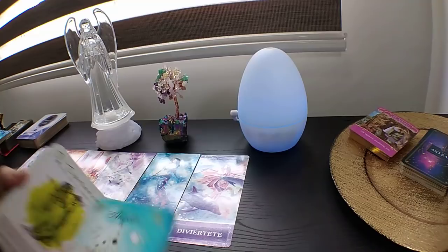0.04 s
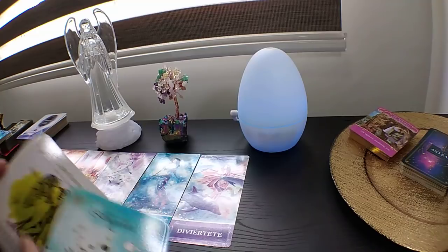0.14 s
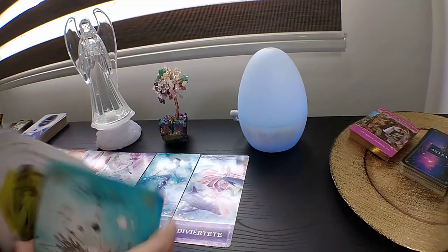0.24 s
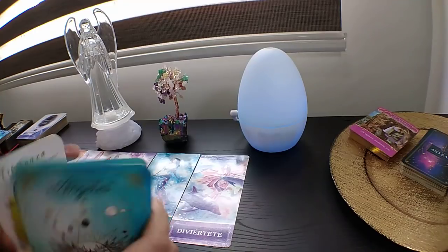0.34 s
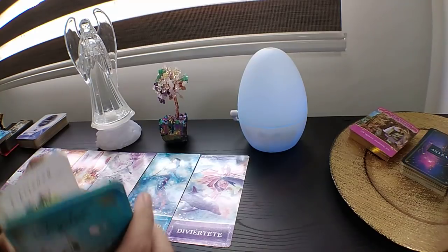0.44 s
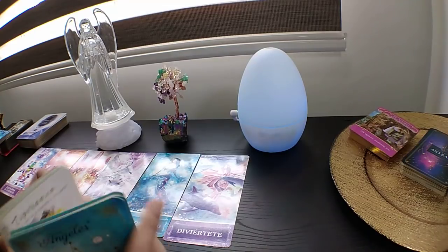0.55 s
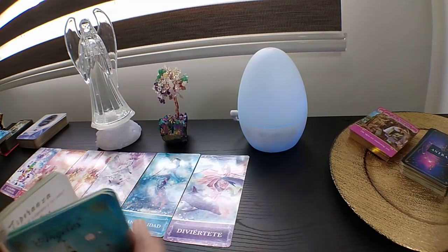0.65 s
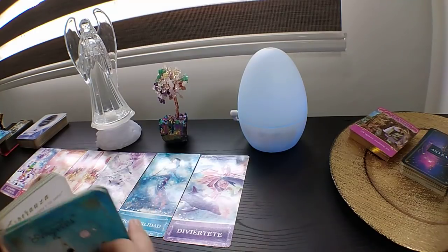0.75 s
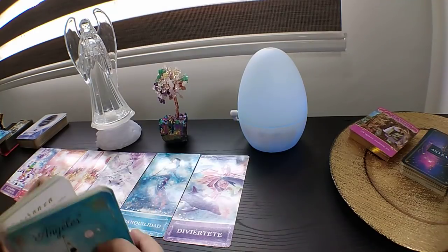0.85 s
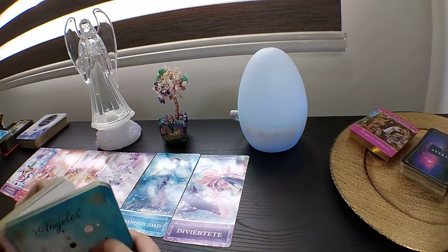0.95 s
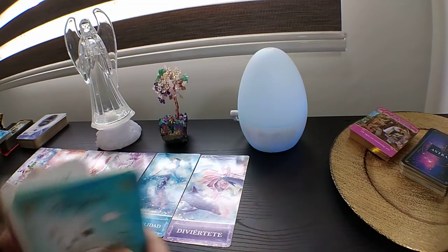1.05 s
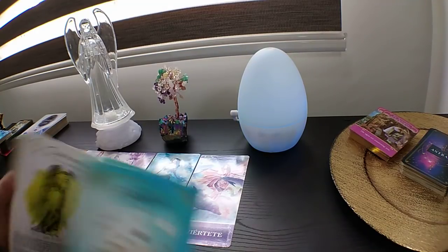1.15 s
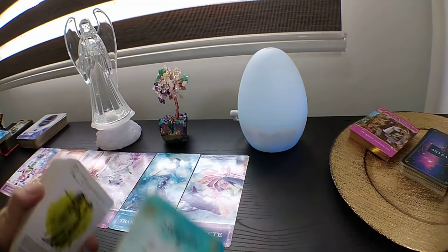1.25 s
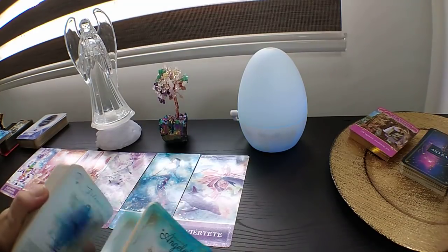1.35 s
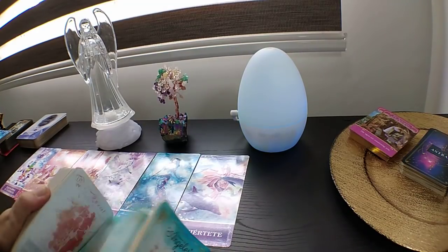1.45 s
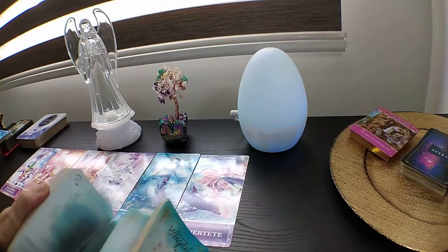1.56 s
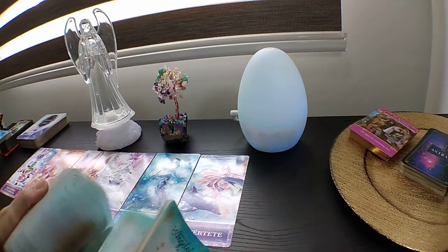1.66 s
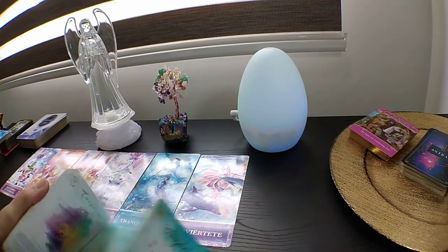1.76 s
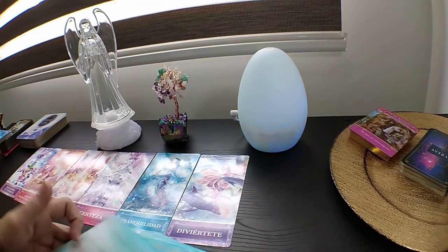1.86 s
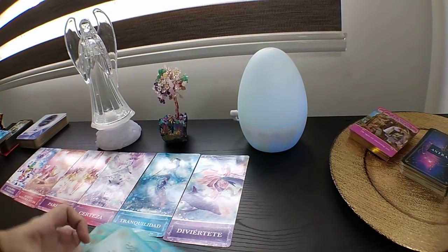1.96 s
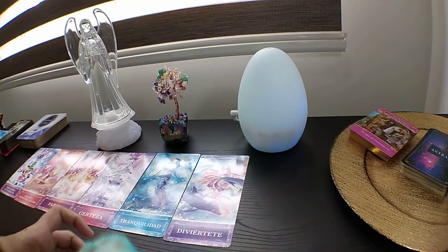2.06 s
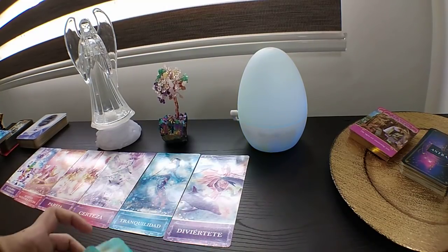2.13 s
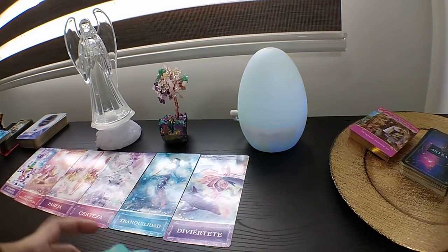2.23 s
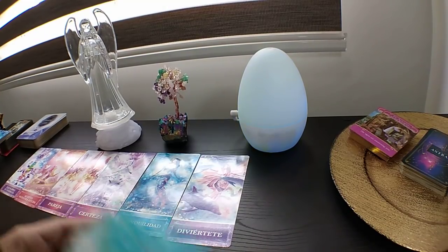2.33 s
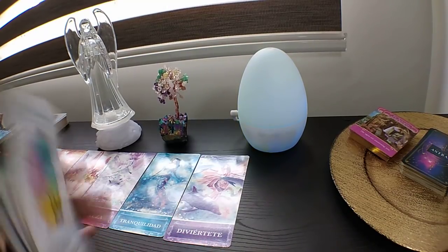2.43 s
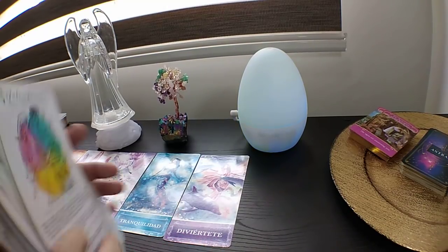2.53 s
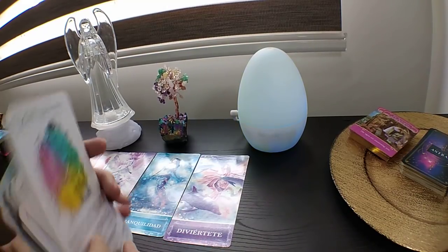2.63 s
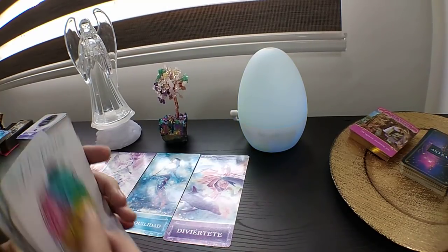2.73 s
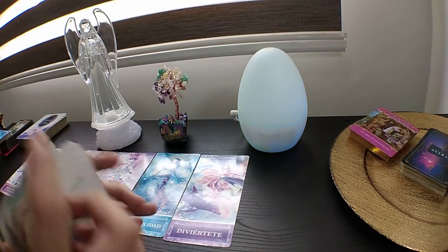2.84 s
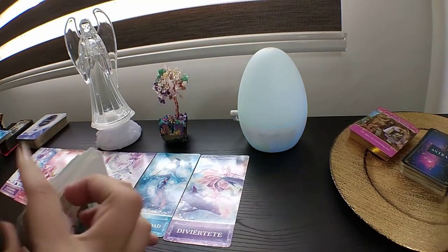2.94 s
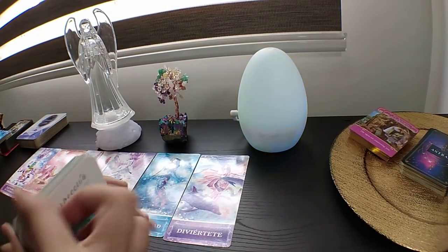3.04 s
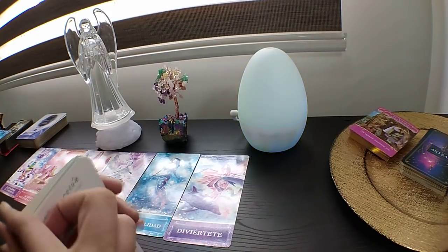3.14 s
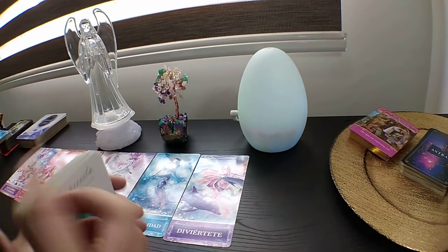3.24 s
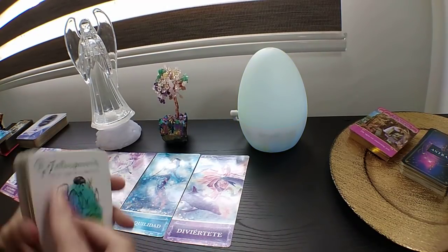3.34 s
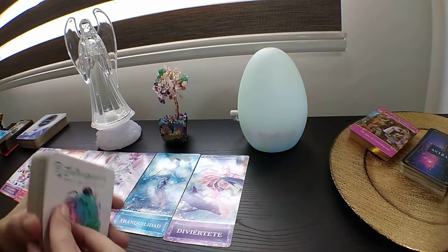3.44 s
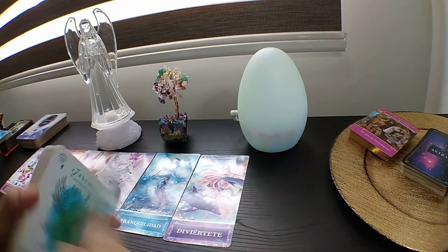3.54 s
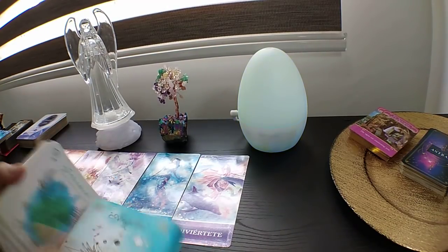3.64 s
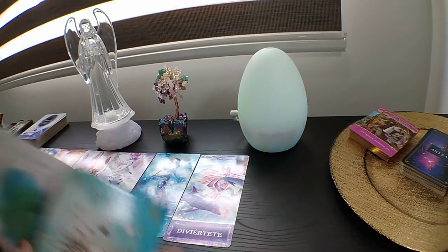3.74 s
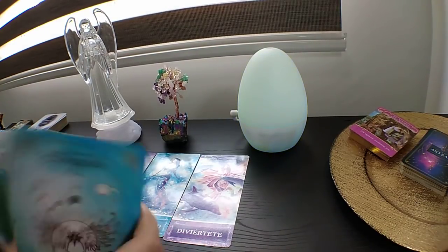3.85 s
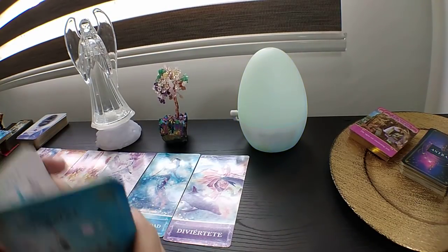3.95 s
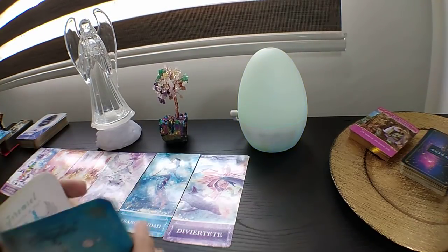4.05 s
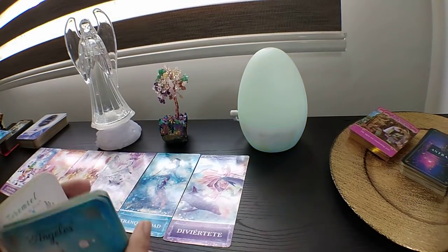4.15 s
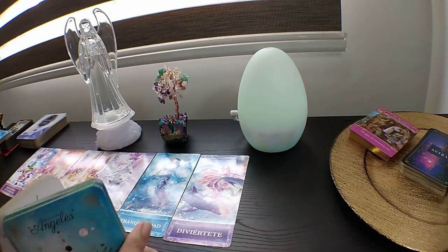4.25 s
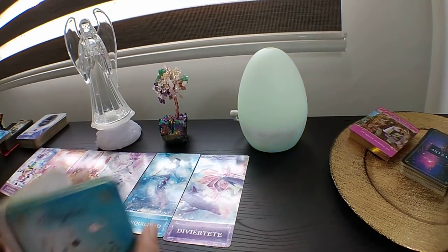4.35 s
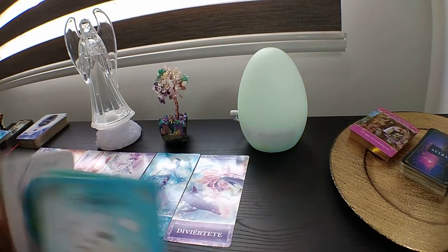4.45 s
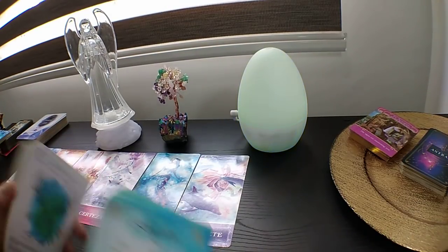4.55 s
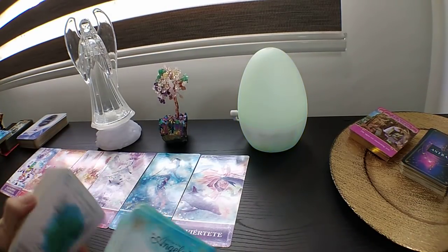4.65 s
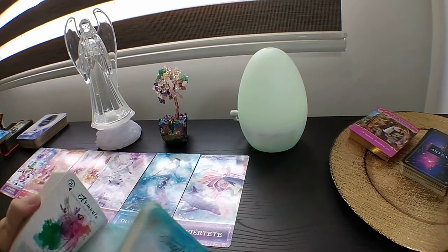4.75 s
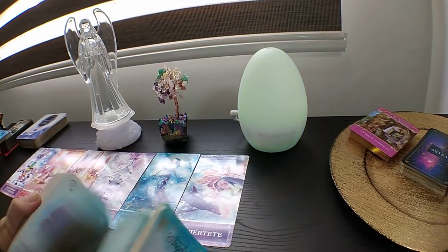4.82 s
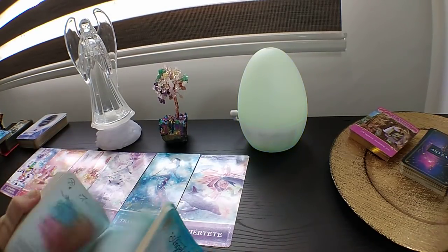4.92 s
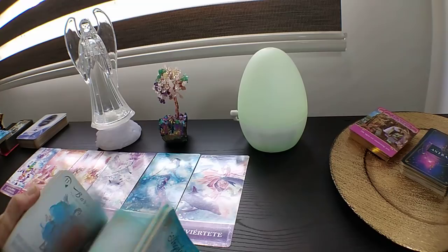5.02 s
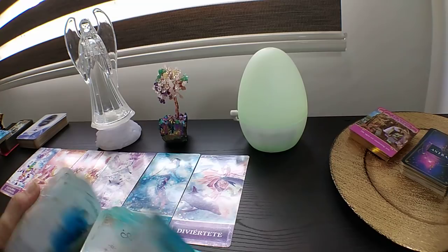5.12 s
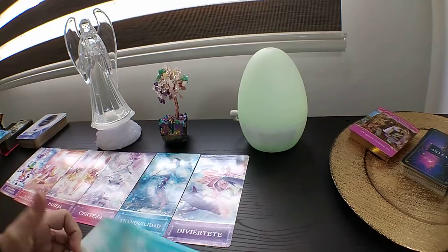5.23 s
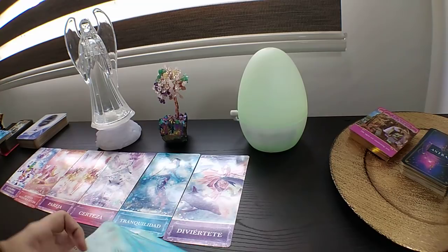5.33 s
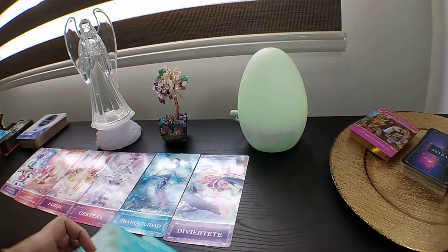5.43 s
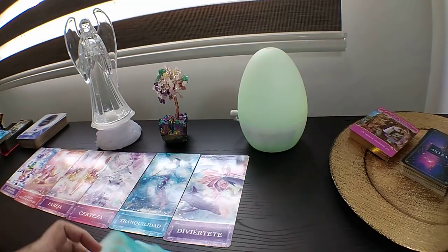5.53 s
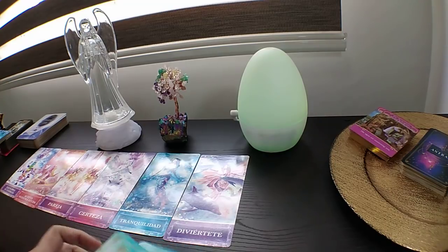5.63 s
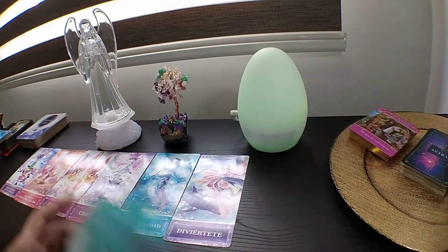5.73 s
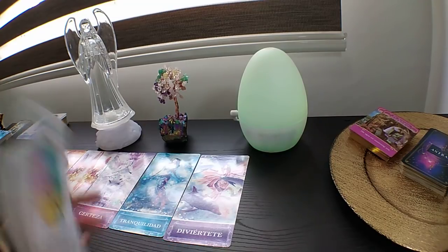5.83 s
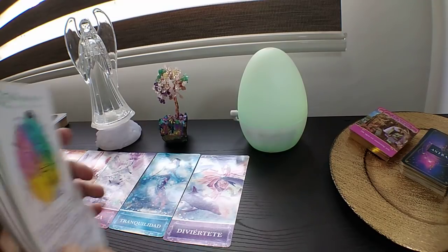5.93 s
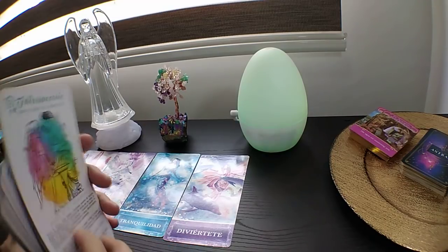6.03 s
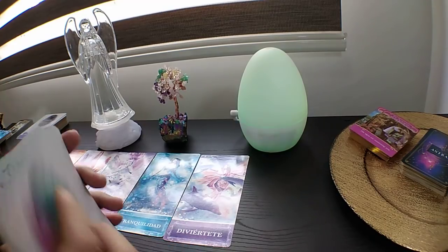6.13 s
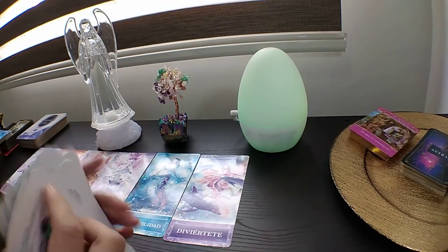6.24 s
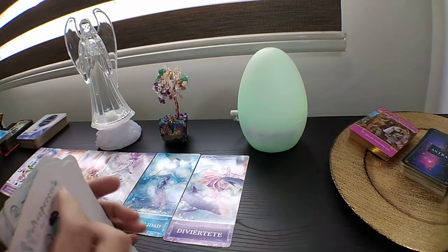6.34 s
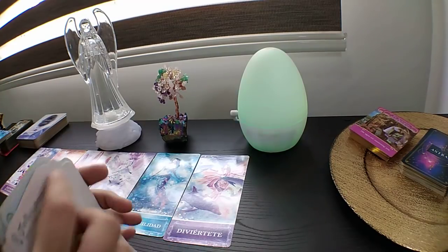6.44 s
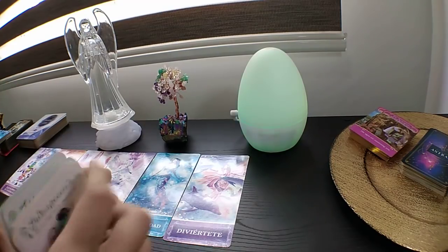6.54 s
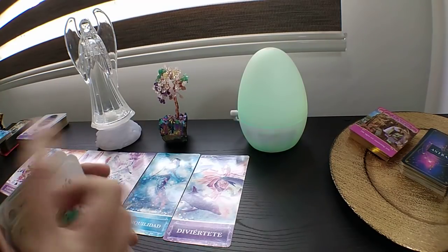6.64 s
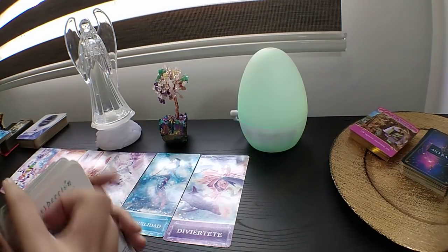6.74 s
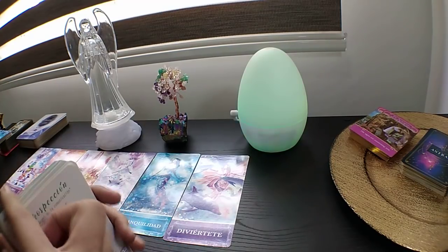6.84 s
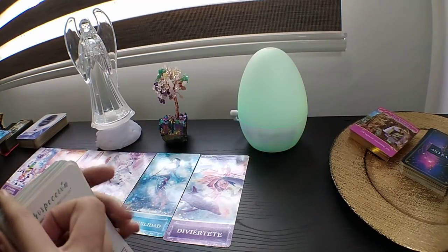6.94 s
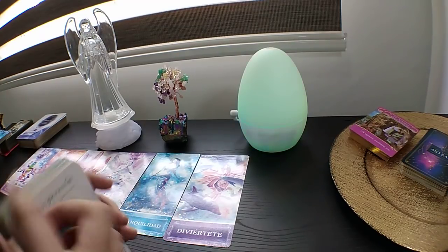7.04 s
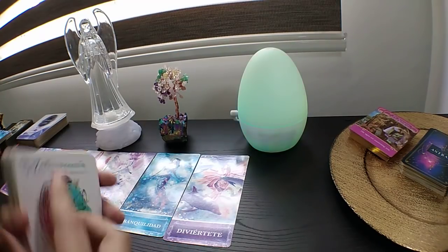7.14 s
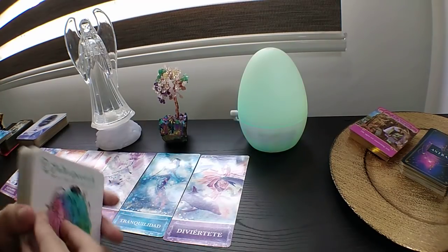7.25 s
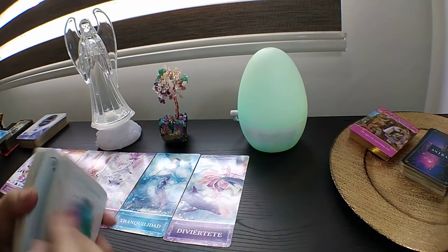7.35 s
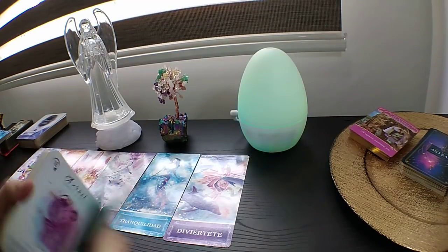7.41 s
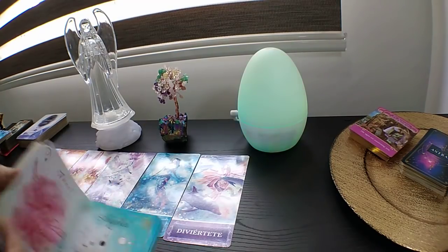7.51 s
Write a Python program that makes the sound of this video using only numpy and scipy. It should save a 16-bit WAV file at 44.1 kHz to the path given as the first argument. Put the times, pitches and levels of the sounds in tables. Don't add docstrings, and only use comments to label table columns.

```python
import sys
import numpy as np
from scipy import signal
from scipy.fft import rfft, irfft, next_fast_len
from scipy.io import wavfile
from scipy.ndimage import uniform_filter1d, map_coordinates

SR = 44100
rng = np.random.default_rng(int(sys.argv[2]) if len(sys.argv) > 2 else 0)


def store_wav(level_fs):
    pcm = np.round(np.clip(np.atleast_2d(level_fs), -1, 1) * 32767)
    wavfile.write(sys.argv[1], SR, pcm.T.astype(np.int16))


def gain_from_db(level_db):
    decades = np.asarray(level_db, float) / 20
    return 10 ** decades


N = 334278
SILENT_DB = -200
EDGE_MS, DULL_RING_DB = 8.65, -16
RIGHT_EARLY = 13


def unit(x):
    return x / np.sqrt(np.mean(x ** 2) + 1e-20)


def along(points, hz):
    f, v = np.transpose(points)
    return np.interp(np.log(hz + 1), np.log(f + 1), v)


def filtered(x, response):
    m = next_fast_len(x.shape[-1] + 4096)
    spectrum = rfft(x, m) * response(np.fft.rfftfreq(m, 1 / SR))
    return irfft(spectrum, m)[..., :x.shape[-1]]


def colour(points):
    return lambda hz: unit(gain_from_db(along(points, hz)))


def modes(rows):
    def response(f):
        total = 0
        for k, (centre, width, db) in enumerate(rows):
            damping = 1j * f * width
            total = total + (-1) ** k * gain_from_db(db) * damping / (centre ** 2 - f * f + damping)
        return total
    return response


def muffled(corner_hz):
    return lambda hz: 1 / (1 + (hz / corner_hz) ** 8)


def causal(gain):
    cepstrum = irfft(np.log(gain + 1e-6))
    half = cepstrum.shape[-1] // 2
    fold = np.r_[1, np.full(half - 1, 2), 1, np.zeros(half - 1)]
    return np.exp(rfft(cepstrum * fold))


def grit(shape, spread_db, share):
    size = np.minimum(rng.exponential(1, shape), 4)
    spikes = rng.standard_normal(shape) * gain_from_db(spread_db * size)
    return unit(spikes * (rng.random(shape) < share))


def landing(ms):
    swell = np.arange(2048) / SR / (0.00027 * np.clip(ms, .5, 45))
    return (swell * np.exp(1 - swell)) ** 2


def cluster(shape, spread_db):
    z = rfft(shape * grit(len(shape), spread_db, share=.5))
    even = irfft(z / np.abs(z) ** .75) * shape ** .3
    return unit(even) * np.sqrt(np.mean(shape ** 2))


# (frequency [Hz], level [dB])
SNAP = [(1500, -14.5), (3000, -5), (5000, -4.5), (8000, -3), (10500, -8), (13500, -19), (15500, -42.5)]


def tinted(knots_db):
    knots_hz = np.linspace(0, 16000, len(knots_db))
    return lambda hz: colour(SNAP)(hz) * gain_from_db(np.interp(hz, knots_hz, knots_db))


# (frequency [Hz], level [dB])
CLACK = [(500, -31), (900, -1.5), (1500, 4), (2200, 1), (3000, -5), (3800, -15.5), (8000, -27),
         (11000, -36), (14000, -69.5)]
# (frequency [Hz], width [Hz], level [dB])
SHEET = [(1485, 99, -9), (2120, 150, -6.5)]


def packet(tilt_db, ring_db=-30):
    def response(hz):
        tilt = tilt_db * np.log2(np.clip(hz, 700, 3000) / 1500)
        ring = 1 + gain_from_db(ring_db) * np.abs(modes(SHEET)(hz))
        return gain_from_db(along(CLACK, hz) + tilt) * ring
    return response


def strokes(rows, attack_share=0.056):
    sag_db, release_db_per_s = 6.5, 607
    t, faces, hands = np.arange(N) / SR, np.zeros(N), np.zeros(N)
    for s, length_s, rasp_db, rumble_db in rows:
        rise = np.clip((t - s) / (attack_share * length_s), 0, 1) ** 2
        sag = sag_db * np.clip((t - s) / length_s, 0, 1)
        release = release_db_per_s * np.maximum(t - s - length_s, 0)
        press = rise * gain_from_db(rasp_db - sag - release)
        faces += press
        hands += press * gain_from_db(rumble_db)
    return faces, hands


# (start [s], length [s], rasp [dB], handling rumble re rasp [dB])
STROKES = [(0, 0.057, -53.5, -8), (0.557, 0.11, -56, -14), (0.865, 0.31, -58.5, -9),
           (1.335, 0.24, -49, -13), (1.487, 0.096, -23, -2.5), (1.62, 0.2, -25, -7.5),
           (1.894, 0.37, -46, -5), (2.25, 0.15, -42, -19.5), (2.441, 0.39, -41, -29),
           (2.87, 0.065, -30.5, -13), (3.003, 0.42, -48, -26), (3.56, 0.035, -72, -36),
           (3.715, 0.052, -50.5, -3.5), (3.84, 0.17, -56.5, -19), (4.116, 0.31, -50, -28),
           (4.558, 0.016, -54.5, -29.5), (4.727, 0.092, -42.5, -25), (4.916, 0.029, -24.5, -25.5),
           (5.051, 0.1, -22.5, -11.5), (5.222, 0.71, -47.5, 3), (5.589, 0.88, -48, -26.5),
           (5.962, 0.19, -35, -40.5), (6.232, 0.00996, -21, -16), (6.279, 0.62, -49.5, -22),
           (6.57, 0.027, -34.5, -18), (6.778, 0.25, -54.5, 11.5), (7.09, 0.17, -66, -22),
           (7.54, 0.16, -32.5, -28)]
# (frequency [Hz], width [Hz], level [dB])
GAPS = [(1900, 630, -0.5), (4770, 1700, 1.5), (5440, 910, 4.5), (9700, 11000, -1.5)]


def slide():
    faces, hands = strokes(STROKES)
    drift = map_coordinates(rng.standard_normal(N // 300 + 4), [np.arange(N) / 300])
    grains = grit((3, N), spread_db=6.0, share=0.14) * gain_from_db(-8.5 + 0.71 * drift)
    rasp = filtered(faces * grains[0], colour(SNAP))
    body = filtered(faces * gain_from_db(1.5) * grains[1], packet(0))
    rub = gain_from_db(-6.0) * filtered(rasp + body, lambda hz: np.abs(modes(GAPS)(hz)))
    whisking, grip = whisks(grains[0])
    rub, hands = rub + whisking, hands + grip
    desk_gain = lambda hz: gain_from_db(along(THUD, hz)) + gain_from_db(along(BOOM, hz))
    rumble = filtered(hands * gain_from_db(8.5) * grains[2], desk_gain)
    return np.array([np.roll(rub, RIGHT_EARLY), rub]) + rumble


# (start [s], length [s], rasp [dB], handling rumble re rasp [dB], top [Hz])
WHISKS = [
    (.045, 0.29, -41.5, -35, 2200),
    (0.3, 0.16, -42.5, -27.5, 13000),
    (3.694, .22, -57, -3, 2900),
    (3.95, 0.2, -49, -26.5, 8300),
    (3.6, 0.11, -59, -16, 6500),
]
# (frequency [Hz], width [Hz], level [dB])
SINGING = [(1855, 200, 0), (2640, 200, -4), (3200, 250, -1.5), (4230, 220, 7.5), (5200, 890, 4),
           (8960, 4800, -1.5)]


def whisks(grains):
    rub, hands = np.zeros(N), np.zeros(N)
    for *row, top_hz in WHISKS:
        whisk, grip = strokes([row], attack_share=0.38)
        song = lambda hz: np.abs(modes(SINGING)(hz)) ** 1.6 * muffled(top_hz)(hz)
        rub += filtered(whisk * grains, song)
        hands += grip
    return rub, hands


# (time [s], snap [dB], clack [dB], left minus right [dB])
BRUSHES = [
    (0.054, -41.5, -59, -2),
    (0.087, -36, -58.5, -8),
    (3.546, -44.5, -89, -7.5),
    (3.704, -43, -75.5, 3),
    (3.814, -48, -64.5, 1),
    (5.53, -57, -49, 1),
    (5.744, -43.5, -63, 0.5),
    (6.0, -38.5, -63.5, -0.5),
    (7.375, -57.5, -88, -5),
]


def brushes():
    return [(s, snap, clack, 2.5, pan, 5.5, 32, DULL_RING_DB) for s, snap, clack, pan in BRUSHES]


# (time [s], snap [dB], clack [dB], left minus right [dB])
TICKS = [(5.6986, -39, -57.5, 2), (5.8611, -37.5, -59, -3), (7.251, -58, -87, 4), (1.3916, -38, -52.5, 1.5),
         (0.226, -43, -62, -2.5), (0.237, -48, -64, 0), (7.388, -50.5, -88, -1), (6.773, -38, -62, 0),
         (1.3285, -36.5, -53, -1), (1.368, -36.5, -55.5, -4), (1.4291, -34.5, -56, 0),
         (2.3997, -39, -50, 7.5), (2.4476, -29, -45, -3), (3.799, -41, -58, -8.5),
         (4.5838, -25.5, -47, 2.5), (4.6928, -39, -55.5, -4), (4.7215, -36, -45, -2), (6.6, -31, -51, 1.5),
         (6.2702, -17.5, -32, 0), (7.102, -51, -88, -1), (7.528, -29, -47.5, 4.5), (0.513, -47, -59.5, -2),
         (2.33, -49, -49, 2), (2.483, -40.5, -49, 0)]


def ticks():
    return [(s, snap, clack, 4.5, pan, 6.5, EDGE_MS, DULL_RING_DB) for s, snap, clack, pan in TICKS]


# (time [s], thud [dB], boom [dB])
BUMPS = [(0.241, -65, -67), (1.33, -25.5, -40), (2.288, -39.5, -49), (2.33, -45, -58.5),
         (2.398, -50.5, -63), (3.802, -47.5, -70), (4.187, -22.5, -35.5), (4.577, -32.5, -48.5),
         (4.715, -27.5, -37.5), (5.525, -17, -29), (5.545, -23.5, -32.5), (5.574, -30.5, -47),
         (5.598, -24, -54.5), (5.639, -31, -56.5), (5.688, -34.5, -59), (5.749, -50, -62.5),
         (6.269, -19.5, -29.5), (6.34, -30, -37)]


def bumps():
    return [(s, (db + 3.0, boom + 25, db - 30 + 17.0, db + 5.5, SILENT_DB), 13) for s, db, boom in BUMPS]


# (time [s], thud [dB], boom [dB], knock re thud [dB])
LANDINGS = [(.547, -17.5, -30.5, -9), (.853, -28.5, -43, -6.5), (1.493, -32, -47.5, -4),
            (1.546, -27.5, -35, -6.5), (1.68, -42.5, -53.5, 1), (1.778, -32, -36.5, -4.5),
            (1.97, -29.5, -41, -11.5), (2.638, -30, -31, 0), (2.849, -23.5, -35, -8.5),
            (2.878, -21.5, -45, -4), (2.987, -21.5, -43, -10), (3.122, -25.5, -50.5, -16.5),
            (3.257, -33, -50.5, -4.5), (4.104, -17, -19, -8), (4.795, -27.5, -41, -7),
            (4.852, -21.5, -41, -13), (4.938, -36, -31.5, -0.5), (5.075, -31.5, -38, -1.5),
            (5.242, -31.5, -36.5, -8), (5.35, -42.5, -42.5, -1.5), (6.037, -27, -37.5, -8.5),
            (6.143, -27, -42, -7.5), (6.229, -25, -41, 4.5), (6.238, -13.5, -35.5, -7),
            (6.594, -27.5, -53, -8.5), (6.739, -33, -44, -14.5), (7.526, -70, -72, 11.5),
            (6.8, -35, -46.5, 0), (2.291, -50, -57, -6), (2.333, -49, -59, -11), (4.583, -45.5, -60, -6.5)]


def landings():
    return [(s, (db + 13.5, boom + 25, db + knock + 16.5, SILENT_DB, SILENT_DB), 8.84)
            for s, db, boom, knock in LANDINGS]


# (time [s], clack [dB], tilt, brighter when thin [dB per octave], snap [dB])
SLAPS = [(0.5488, -20.5, 2.5, -52), (0.5709, -36, -13, -46), (2.6379, -36, -2.5, -39),
         (2.678, -46.5, -4.5, -29), (2.8073, -37, -9.5, -46.5), (2.8489, -37.5, -18.5, -30.5),
         (2.8997, -33, -6.5, -23.5), (3.1233, -29.5, -10.5, -30), (4.1032, -15, -3, -35.5),
         (4.1124, -29, -9, -25), (4.1248, -30, -22.5, -39), (4.1384, -35.5, 13.5, -37),
         (4.1892, -22, -2.5, -29.5), (4.1969, -27, -6, -27), (6.1437, -24.5, -2.5, -37),
         (6.2379, -11, -5, -15), (6.592, -30, -1, -26), (6.7393, -31.5, -6, -38),
         (6.7841, -31.5, -6.5, -32), (6.229, -24.5, -7, -39), (.65, -29.5, -9, -49),
         (6.251, -19.5, -4.5, -28), (3.271, -34.5, -1.5, -55), (.583, -33, -2, -53)]


def slaps():
    return [(s, snap, clack, tilt, 5, 1.2, EDGE_MS, DULL_RING_DB) for s, clack, tilt, snap in SLAPS]


DROP_S = [6.2385, 6.25, 6.232, 6.3, .552, .572, .65, 4.107, 2.9, 6.037, 6.144, 5.53]
DROPS = [-5, -11, -17, -20, -27, -24, -25, -24, -25, -29, -30, -30]


def drops():
    return [(s, (SILENT_DB,) * 4 + (db + 3,), 8.84) for s, db in zip(DROP_S, DROPS)]


TAP_S = [.843, .852, 2.8788, 2.9875, 2.9984, 3.259, 6.0914, 5.0795, 4.853, 6.801, 6.594]
# (clack [dB], snap [dB], facing gain [dB], length [ms])
TAPS = [(-34, -74, -1, 14.7), (-31, -40, 8, 8), (-18, -27, 9, 10), (-25.5, -25, 5, 11), (-31.5, -43, 12, 6),
        (-32, -62, 12, 8), (-33, -42, 12, 11), (-29, -45, 6, 9.2), (-32, -45, 6, 5.3), (-31, -39, 4.5, 7.3),
        (-33.5, -43, 5.5, 10.6)]


def taps():
    return [(s, snap, clack, 4.5, 4.7, facing, ms, 8.5)
            for s, (clack, snap, facing, ms) in zip(TAP_S, TAPS)]


# (time [s], snap [dB], clack [dB], left minus right [dB], length [ms])
FLICKS = [(1.451, -28.5, -42, -1, 15), (1.4945, -24, -35.5, 4, 20), (1.5109, -25.5, -47.5, -1.5, 22),
          (1.5475, -13.5, -30, 2, 9), (1.5596, -16.5, -56, 2, 22), (1.571, -26, -49, 2, 23),
          (1.6247, -5, -33, 5.5, 6.9), (1.655, -20, -41, -2.5, 8.9), (1.6835, -13.5, -29, -4, 18),
          (1.6957, -12, -39, -2, 3.5), (1.778, -13.5, -36.5, -4.5, 15), (1.786, -13.5, -32, -2, 10),
          (1.82, -16, -51, -1.5, 4), (1.8643, -22, -39, 0, 13), (1.9086, -9, -31.5, 1, 6),
          (1.927, -27, -54, 0.5, 5), (1.9396, -17.5, -39, 3, 8.4), (1.972, -17, -35.5, -1, 16),
          (2.287, -29.5, -53, 0.5, 26), (4.7972, -23.5, -39.5, 7.5, 10), (4.8213, -18.5, -61, 7, 14),
          (4.834, -20.5, -42, 2.5, 10), (4.852, -11, -26.5, 10, 5), (4.8562, -7, -43, 13, 8.2),
          (4.93, -21, -33.5, 6, 12), (4.9379, -6.5, -36, 7.5, 11), (4.949, -19, -40.5, 4.5, 10),
          (5.05, -12, -33, -6, 5), (5.078, -10, -24, 1, 15), (5.099, -13, -57, 2.5, 11),
          (5.123, -26, -48, 1, 6.73), (5.134, -18, -41, -8.5, 8), (5.1458, -15, -27.5, -1, 12.1),
          (5.155, -18, -42, 2.5, 16), (5.1912, -12, -56, -3, 3), (5.2455, -11, -31.5, 4, 5),
          (5.262, -23, -31.5, 0, 14), (4.8473, -21.5, -39.5, 6.5, 8), (5.324, -13, -64.5, 5, 8.1),
          (5.353, -17.5, -35.5, 6.5, 4.5)]


def flicks():
    return [(s, snap, clack, -0.5, pan, 5 - 0.5 * np.log2(ms / EDGE_MS), ms, DULL_RING_DB)
            for s, snap, clack, pan, ms in FLICKS]


def contacts():
    tint_db, lag_samples, lag_scatter = 3, 6, 4
    out = np.zeros((3, N + SR))
    touches = flicks() + ticks() + slaps() + brushes() + taps()
    for s, snap_db, clack_db, tilt_db, pan_db, facing_db, ms, ring_db in touches:
        edges = cluster(landing(ms), spread_db=-2.5)
        chance = rng.standard_normal(9)
        snap = gain_from_db(snap_db - 16.0) * filtered(edges, tinted(tint_db * chance))
        if clack_db > snap_db - 5:
            snap = filtered(snap, muffled(9200))
        body = cluster(landing(ms), spread_db=1.5)
        clack = gain_from_db(clack_db + 7.0) * filtered(body, packet(tilt_db, ring_db))
        lag = lag_samples + lag_scatter * chance[0]
        for side, sign in enumerate((1, -1)):
            start = round((s - .001) * SR + sign * lag)
            gain = gain_from_db(facing_db + sign * pan_db / 2)
            out[side, start:start + len(snap)] += gain * (snap + clack)
        out[2, start:start + len(snap)] += gain_from_db(-1.0) * snap + clack
    return out[:, :N]


# (frequency [Hz], level [dB])
THUD = [(60, -24), (130, -6), (200, -5.5), (260, 3), (310, 5.5), (400, -6), (550, -34), (1000, -67)]
# (frequency [Hz], level [dB])
BOOM = [(40, -44.5), (70, -11), (105, -1), (160, -7), (220, -8), (400, -62)]
# (frequency [Hz], level [dB])
KNOCK = [(250, -34), (420, 0), (650, 2), (900, -7), (1400, -15), (3000, -80.5)]
# (frequency [Hz], level [dB])
WRIST = [(70, -27.5), (112, -12.5), (145, -3), (164, -5), (185, 0), (218, -9), (255, 1), (420, -41)]
# (frequency [Hz], level [dB])
DECK = [(150, -30), (260, -4), (380, -1), (500, 0), (620, -9), (1000, -42)]


def thuds():
    drive = np.zeros((5, N + SR))
    for s, levels_db, ms in landings() + bumps() + drops():
        push = cluster(landing(ms), spread_db=1.0)
        padded, clean = landing(5), landing(1.5)
        push = np.array([push, push, push, padded, clean])
        start = round((s - 0.0012) * SR)
        drive[:, start:start + push.shape[1]] += gain_from_db(levels_db)[:, None] * push
    hz = np.fft.rfftfreq(8192, 1 / SR)
    gains = gain_from_db([along(part, hz) for part in (THUD, BOOM, KNOCK, WRIST, DECK)])
    desk = signal.fftconvolve(drive[:, :N], irfft(causal(gains)), axes=1)[:, :N]
    near = desk.sum(0)
    far = desk[:3].sum(0) + gain_from_db(-3) * desk[4] + gain_from_db(-9.5) * desk[3]
    return np.array([np.roll(near, RIGHT_EARLY), near]), far


# (frequency [Hz], level [dB])
STANDING = [(104, -11.5), (143, -3.5), (181, -3), (199, -0.5), (251, -0.5), (308, -8.5), (377, -7.5),
            (467, 0), (508, -6), (567, -3.5), (637, -5.5), (770, -5), (885, -11.5), (1067, -4)]
# (frequency [Hz], T60 [s])
ROOM = [(300, 0.85), (1500, 0.66), (4000, 0.59), (10000, 0.5), (14000, 0.38)]
# (frequency [Hz], correlation [0-1])
ALIKE = [(200, .92), (300, .82), (640, .25), (1400, 0)]


def room(x, size=SR // 4):
    count = N // size + 1
    hz, t, z = signal.stft(rng.standard_normal((count, 2, SR)), SR, nperseg=256)
    turn = np.arccos(np.clip(along(ALIKE, hz), -1, 1))[:, None] / 2
    mid, side = z[:, 0] * np.cos(turn), z[:, 1] * np.sin(turn)
    treble_lift = 1 / (1 + (450 / (hz[:, None] + 1)) ** 4) + 2.1
    fade = gain_from_db(-60 * t / along(ROOM, hz)[:, None]) * treble_lift
    tails = signal.istft(np.stack([mid + side, mid - side], 1) * fade, SR, nperseg=256)[1][..., :SR]
    t = np.arange(SR) / SR
    arrival = 1 - np.exp(-(t / 0.0083) ** 2)
    arrival = arrival * (1 + .5 * np.exp(-t / 0.015))
    tails = tails * arrival / np.sqrt(np.mean(np.sum(tails ** 2, -1)))
    waves = np.zeros((2, SR))
    for f, db in STANDING:
        phase = rng.normal(0, .12 + f / 600, (2, 1)) + rng.uniform(0, 2 * np.pi)
        waves += gain_from_db(db - 60 * t / 0.7) * np.sin(2 * np.pi * f * t + phase)
    tails = tails + gain_from_db(-13.5) * waves / np.linalg.norm(waves[0])
    blocks = np.pad(x, (0, count * size - N)).reshape(count, 1, size)
    wet, out = signal.fftconvolve(blocks, tails, axes=2), np.zeros((2, N + 2 * SR))
    for k, piece in enumerate(wet):
        out[:, k * size:k * size + piece.shape[1]] += piece
    return out[:, :N]


# (frequency [Hz], level [dB])
HISS = [(35, -35.5), (60, 10), (325, -21.5), (437, -15), (4470, -11), (4900, -3.5), (8480, -7.5),
        (14000, -18.5)]


def scene():
    edges, (desk, far), rub = contacts(), thuds(), slide()
    hiss = gain_from_db(-77.0) * filtered(rng.standard_normal((2, N)), colour(HISS))
    echo = gain_from_db(5.5) * room(edges[2] + far + rub[1])
    return edges[:2] + desk + rub + echo + hiss


# (frequency [Hz], width [Hz], level [dB])
PORTS = [
    [(8470, 1400, 5.5), (5300, 690, -20)],
    [(8040, 5700, -1.5), (5430, 1000, 12)],
]
# (frequency [Hz], level [dB])
TRIM = [(30, -13.5), (55, 0.5), (300, 0), (600, 0.5), (2500, 0.5), (5000, -1), (10000, 0.5), (13500, 1)]
# (frequency [Hz], level [dB])
TRIM_RIGHT = [(30, -17), (55, -2), (300, 1), (600, -0.5), (2500, -0.5), (5000, 0), (10000, -1),
              (13500, -4.5)]


def ports(dry):
    def response(hz):
        pairs = zip(PORTS, (TRIM, TRIM_RIGHT))
        return np.array([(1 + modes(port)(hz)) * gain_from_db(along(trim, hz)) for port, trim in pairs])
    return filtered(dry, response)


# (frequency [Hz], level [dB])
GATE = [(60, -105), (300, -76), (700, -74), (2000, -84), (3600, -90), (4600, -92.5), (8000, -91),
        (13000, -98)]


def suppressed(x):
    hz, _, z = signal.stft(x, SR, nperseg=512)
    power = uniform_filter1d(np.abs(z) ** 2, 3, 1)
    power = np.abs(uniform_filter1d(power, 3, 2))
    noise = gain_from_db(along(GATE, hz))[:, None] ** 2
    gain = np.maximum(gain_from_db(-12), (power / (power + noise)) ** 1.2)
    return signal.istft(z * gain, nperseg=512)[1][:, :N]


# (frequency [Hz], level re neighbours [dB])
HOLES = [(1000, -12), (2500, -6), (3600, -4.5), (5000, -6), (9000, -5.5), (11000, -2), (14000, -.5)]


def masked(x, scatter_db):
    hz, _, z = signal.stft(x, SR, nperseg=2048)
    power = np.sum(np.abs(z[:, 1:]) ** 2, 0).reshape(256, 4, -1).mean(1)
    level = 10 * np.log10(power + 1e-20)
    chance = uniform_filter1d(rng.standard_normal(level.shape), 3, 1)
    chance = unit(uniform_filter1d(chance, 3, 0))
    margin = along(HOLES, hz[2::4])[:, None] + scatter_db * chance
    keep = np.where(level < uniform_filter1d(level, 21, 0) + margin, .05, 1)
    keep[:40] = 1
    gain = np.pad(np.repeat(keep, 4, 0), ((1, 0), (0, 0)))
    return signal.istft(z * gain, nperseg=2048)[1][:, :N]


def band_limit(x):
    return signal.sosfilt(signal.butter(12, 15460, fs=SR, output="sos"), x)


def record(dry):
    x = suppressed(ports(dry))
    x = masked(x, scatter_db=5.5)
    return band_limit(np.clip(x, -1, 1))


dry = scene()
out = record(dry)
store_wav(out)
```